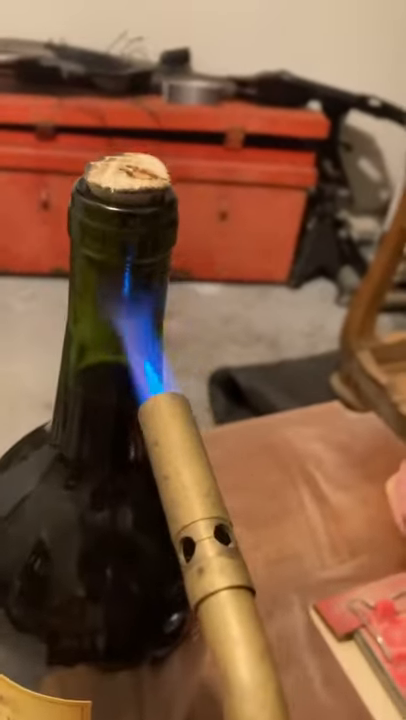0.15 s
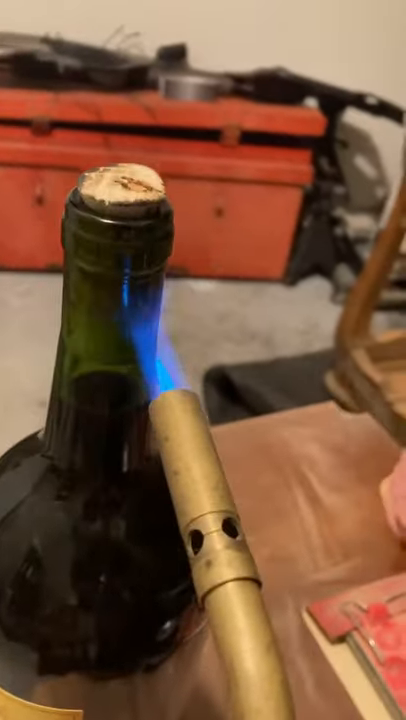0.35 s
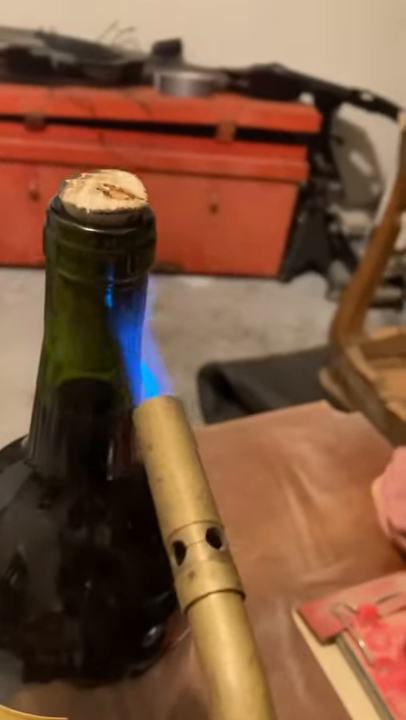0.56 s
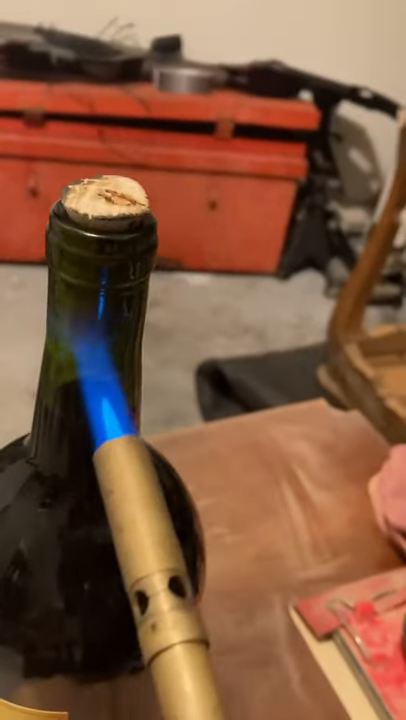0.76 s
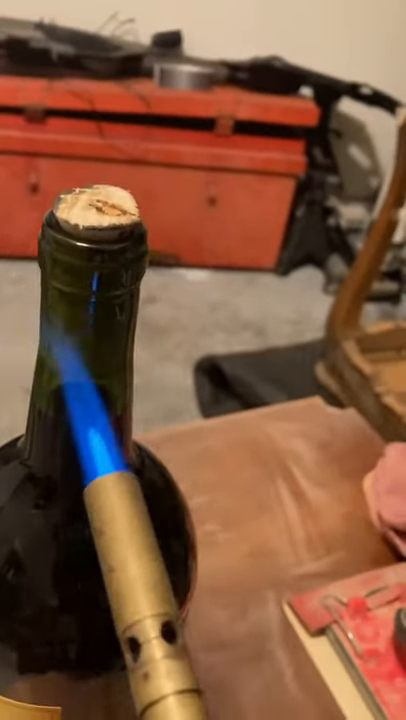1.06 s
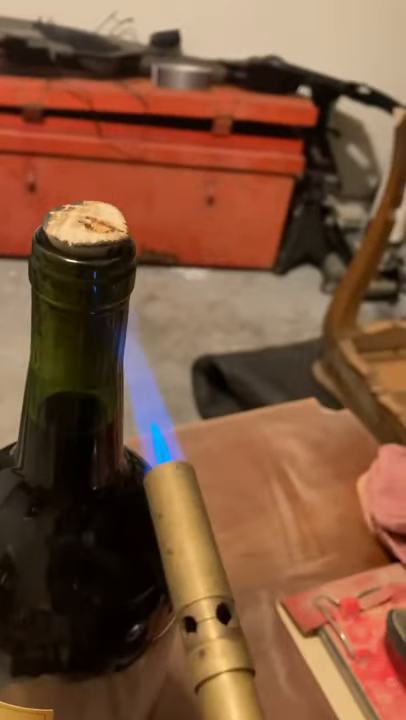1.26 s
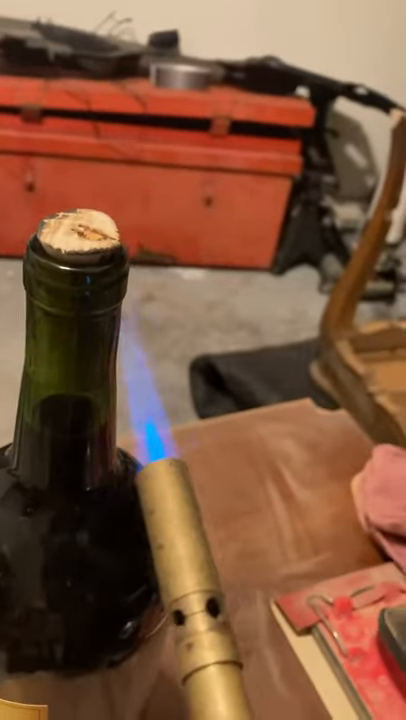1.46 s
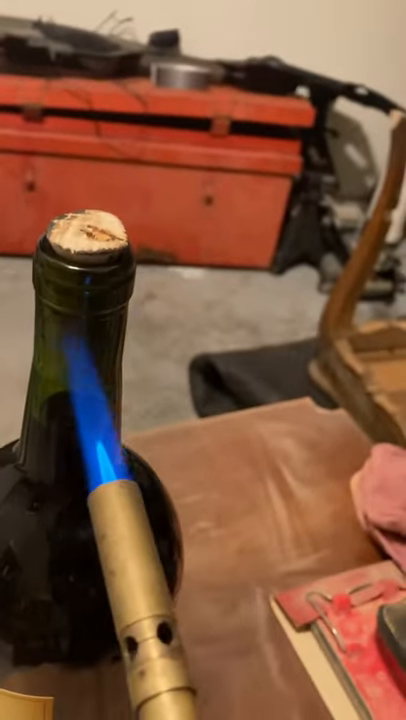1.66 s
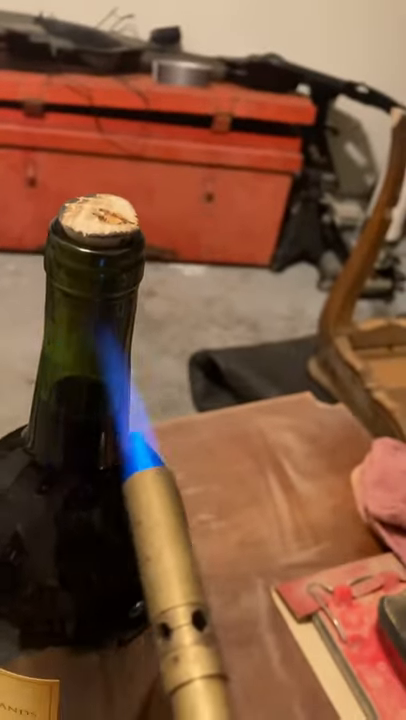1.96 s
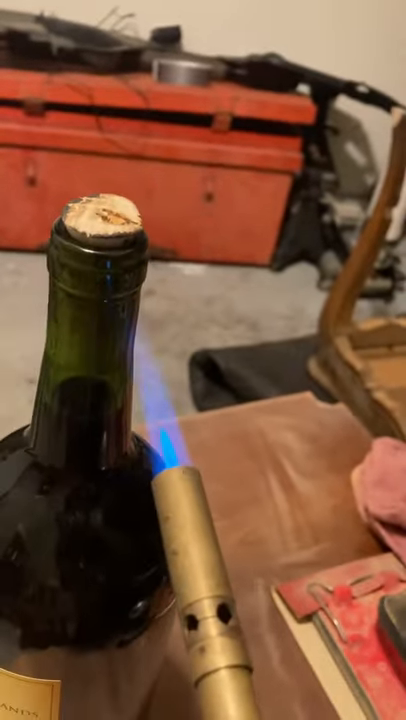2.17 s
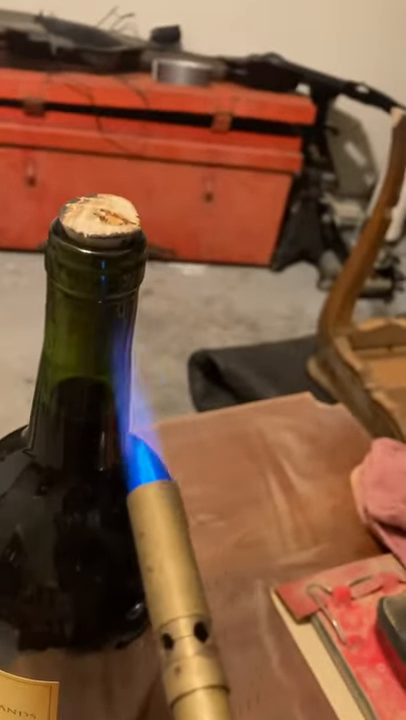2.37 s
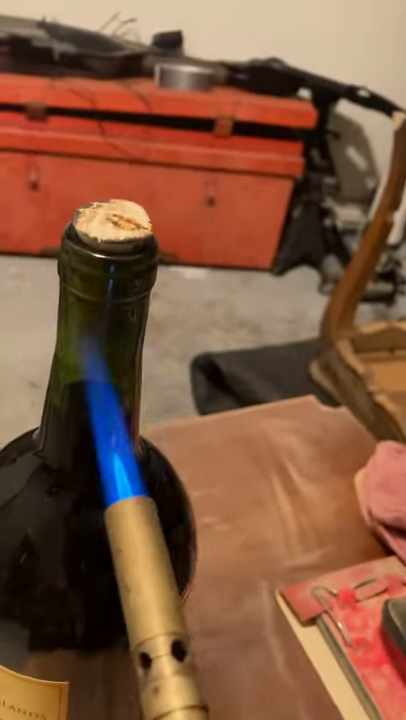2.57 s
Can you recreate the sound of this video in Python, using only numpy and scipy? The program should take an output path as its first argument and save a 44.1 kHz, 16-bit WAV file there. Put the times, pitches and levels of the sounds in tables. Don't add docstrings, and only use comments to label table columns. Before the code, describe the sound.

Gas torch flame roaring softly and hissing without pause against a glass bottle neck, close by

```python
import sys
import numpy as np
from scipy import signal
from scipy.fft import rfft, irfft, next_fast_len
from scipy.io import wavfile
from scipy.ndimage import uniform_filter1d, map_coordinates

SR = 44100
rng = np.random.default_rng(int(sys.argv[2]) if len(sys.argv) > 2 else 0)


def invert_db(level):
    return 10 ** (np.asarray(level, dtype=float) / 20)


def unload_audio(sound):
    columns = np.transpose(np.atleast_2d(sound))
    steps = np.round(np.clip(columns, -1, 1) * 32767)
    wavfile.write(sys.argv[1], SR, steps.astype(np.int16))


N = 119511
T = np.arange(N) / SR
SIZE = next_fast_len(N + 8192)
HZ = np.arange(SIZE // 2 + 1) * SR / SIZE + 1e-9
SWAY_RATE_HZ, FLUTTER_RATE_HZ, FLICKER_RATE_HZ = 3, 40, 12
PORT_SIGNS = np.array([[1], [-1]])


def through(x, response):
    return irfft(rfft(x, SIZE) * response, SIZE)[..., :N]


def walk(rate_hz):
    hold = int(SR / rate_hz)
    levels = np.repeat(rng.standard_normal(N // hold + 1), hold)
    slewed = uniform_filter1d(uniform_filter1d(levels, hold), hold)[:N]
    return (slewed - slewed.mean()) / slewed.std()


def turbulence(colour, shared_db):
    flicker_db = 0.5
    octave = np.log2(HZ)
    spectrum = 0
    for centre in range(5, 15):
        band = np.cos(np.pi / 2 * np.clip(octave - centre, -1, 1))
        noise = rng.standard_normal(N)
        noise = noise * invert_db(shared_db + flicker_db * walk(FLICKER_RATE_HZ))
        spectrum = spectrum + rfft(noise, SIZE) * band
    hz, db = np.array(colour).T
    tilt_db = np.interp(octave, np.log2(hz), db, left=-60, right=-60)
    x = irfft(spectrum * invert_db(tilt_db), SIZE)[:N]
    return x / x.std()


def paths(table):
    response = 0
    for delay_ms, gain, edge_hz in table:
        delay = np.exp(-2j * np.pi * HZ * delay_ms / 1000)
        response = response + gain * delay / np.sqrt(1 + (HZ / edge_hz) ** 4)
    return response


def flame(flow):
    # (frequency [Hz], density [dB per Hz])
    roar_colour = [(38, -19.5), (60, -7.5), (130, -8), (215, 0), (450, -4), (1500, -5), (3600, -9.5),
                   (4700, -16.5)]
    # (time [s], peak [dB], pitch [Hz])
    sputters = [
        (0.139, -39, 816),
        (0.531, -31, 644),
        (1.487, -37, 985),
    ]
    roar_db, flutter_db = 4.5, 0.87
    puff_s, puff_db = 0.004, 4
    ring_db, ring_t60_s = -1, 0.03
    puff, ring = np.zeros(N), np.zeros(N)
    for start_s, db, hz in sputters:
        age = np.clip(T - start_s, 0, None)
        puff += np.exp(-((T - start_s - puff_s) / puff_s) ** 2)
        decay = invert_db(db + ring_db - 60 * age / ring_t60_s)
        ring += decay * np.sin(2 * np.pi * hz * age)
    unrest_db = flutter_db * walk(FLUTTER_RATE_HZ) + puff_db * puff
    return flow * invert_db(roar_db) * turbulence(roar_colour, unrest_db) + ring


def jet(flow, aim_db):
    # (frequency [Hz], density [dB per Hz])
    jet_colour = [(4000, -11.5), (5700, -6.5), (7600, -9.5), (9700, -1.5), (11200, -7.5), (12700, -6.5),
                  (14000, -14), (15700, -23)]
    # (frequency [Hz], lead [cycles])
    lead = [(4250, -.62), (4900, -.57), (5500, -.49), (6050, -.43), (6500, -.34), (7600, -.12), (9200, .07),
            (11100, .45), (11900, .5), (12700, .61), (13550, .82), (14200, .98)]
    jet_db, flutter_db = 2, 0.33
    near_share = 0.972
    echo_ms, echo_gain = 1.63, 0.14
    hole_hz, hole_width_hz, hole_db = 5120, 400, 6
    aim_hz, aim_gain = 12140, 2.4
    twist_cycles, top_twist_cycles, top_twist_rate_hz = 0.018, 0.065, 11

    near = turbulence(jet_colour, flutter_db * walk(FLUTTER_RATE_HZ))
    scattered = turbulence(jet_colour, flutter_db * walk(FLUTTER_RATE_HZ))
    both = np.sqrt(near_share) * near + np.sqrt(1 - near_share) * scattered * PORT_SIGNS

    turn = np.exp(1j * np.pi * np.interp(HZ, *np.array(lead).T))
    echo = 1 + echo_gain * np.exp(-2j * np.pi * HZ * echo_ms / 1000)
    holes = invert_db(hole_db * np.exp(-((HZ - hole_hz) / hole_width_hz) ** 4))
    ports = np.array([turn, turn.conj()]) * echo * holes

    top = 1 / (1 + (aim_hz / HZ) ** 16)
    body_part = (1 - top, 1, twist_cycles * walk(SWAY_RATE_HZ))
    top_part = (top, invert_db(aim_gain * aim_db), top_twist_cycles * walk(top_twist_rate_hz))
    hiss = 0
    for band, gain, cycles in (body_part, top_part):
        twist = np.pi * cycles * PORT_SIGNS
        in_phase = np.cos(twist) * through(both, band * ports)
        quadrature = np.sin(twist) * through(both, 1j * band * ports)
        hiss = hiss + gain * (in_phase + quadrature)
    return flow * invert_db(jet_db) * hiss


def room(x):
    level_db, t60_s, delay_s = -13, 0.39, 0.0037
    t = T[:8192]
    tail = rng.standard_normal((2, len(t))) * invert_db(-60 * t / t60_s) * (t > delay_s)
    tail = tail / np.sqrt((tail ** 2).sum(axis=1, keepdims=True))
    mid, side = rfft(tail, SIZE)
    side = side * HZ / np.hypot(HZ, 900)
    return invert_db(level_db) * through(x, np.array([mid + side, mid - side]))


def glass(left, right):
    # (centre [Hz], width [Hz], level over right port [dB], lead [cycles])
    mirror_bands = [(3600, 300, 2, .37), (4350, 300, 5, .25)]
    ends_s, fade_s = 0.71, 0.058
    share = 1 / (1 + np.exp((T - ends_s) / fade_s))
    for hz, width_hz, db, cycles in mirror_bands:
        band = np.exp(-((HZ - hz) / width_hz) ** 4)
        mirrored = through(right, band * invert_db(db) * np.exp(2j * np.pi * cycles))
        left = left + share * (mirrored - through(left, band))
    return np.array([left, right])


def handling():
    # (time [s], peak [dB], pitch [Hz])
    knocks = [
        (.755, -50, 62),
        (2.41, -50, 48),
    ]
    knock_s, rumble_db, rumble_hz = 0.019, -79, 55
    colour = 1 / (1 + (HZ / rumble_hz) ** 4) / (1 + (40 / HZ) ** 4)
    rumble = through(rng.standard_normal((2, N)), colour)
    thuds = 0
    for start_s, db, hz in knocks:
        age = T - start_s
        swell = np.exp(-((age - knock_s) / knock_s) ** 2)
        thuds = thuds + invert_db(db) * swell * np.sin(2 * np.pi * hz * age)
    return invert_db(rumble_db) * rumble / rumble.std() + thuds


def scene():
    # (time [s], gas flow [dB], extra echo delay [ms], nozzle aim: top treble [dB],
    # flame pressed on the glass: roar [dB])
    hand = [(0, -46.5, 0.05, -1, 2), (.4, -46, -0.079, -1.5, 0.5), (.6, -45.5, -0.089, -1, 0),
            (.85, -45, -0.024, -2.5, 0.5), (.97, -45, 0.013, -2.5, 0.3), (1.1, -44.5, 0.018, -2, -0.3),
            (1.18, -44.5, 0.032, -2.5, -0.4), (1.25, -44.5, .01, -3, 0), (1.36, -45, -0.037, -4.5, -.5),
            (1.5, -45.5, 0.038, -2, -0.5), (1.62, -45, -0.021, -4, 0.2), (1.72, -45.5, -0.0011, -2.5, 1),
            (1.97, -45.5, 0.051, -2, 0), (2.1, -45.5, 0.038, -1, 0), (2.35, -45.5, 0.0027, -5, 0),
            (2.43, -45, -0.0014, -2, -0.5), (2.58, -46, -0.018, -5, 0.5), (2.71, -45.5, 0.019, -3, 1)]
    # (delay [ms], gain [ratio], treble edge [Hz])
    left_paths = [(-0.05, 0.42, 1800), (-0.25, -0.18, 1300), (0.2, 0.29, 1400), (0.5, -0.07, 12000),
                  (0.81, 0.21, 1600), (1.35, 0.64, 12000), (1.39, -0.58, 12000), (3.84, 0.05, 3100),
                  (7.46, 0.02, 12000), (9.03, 0.08, 600), (9.39, -0.07, 1700), (10.29, 0.06, 4000)]
    right_paths = [(0, 1., 4800), (1.17, .09, 2100), (1.6, .26, 5600), (1.8, -.09, 9000),
                   (2.23, -.08, 3000), (8.82, .18, 800), (10.37, .09, 2700), (12.7, .05, 2700)]
    sway_db, shake_ms = 0.14, 0.047
    time_s, *controls = np.array(hand).T
    flow_db, extra_ms, aim_db, press_db = (np.interp(T, time_s, c) for c in controls)
    flow = invert_db(flow_db + sway_db * walk(SWAY_RATE_HZ))
    roar = flame(flow * invert_db(press_db))
    late = (extra_ms + shake_ms * walk(SWAY_RATE_HZ)) * SR / 1000
    moved = map_coordinates(roar, [np.arange(N) - late], mode="mirror")
    direct = through(roar, np.array([paths(left_paths[:4]), paths(right_paths[:1])]))
    echoes = through(moved, np.array([paths(left_paths[4:]), paths(right_paths[1:])]))
    left, right = direct + echoes + room(moved) + jet(flow, aim_db)
    return glass(left, right) + handling()


def top_cut(x):
    return signal.sosfilt(signal.butter(12, 15650, fs=SR, output="sos"), x)


def record(dry):
    return top_cut(dry)


dry = scene()
out = record(dry)
unload_audio(out)
```